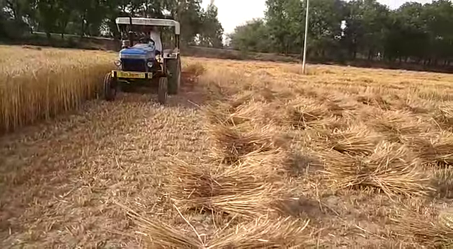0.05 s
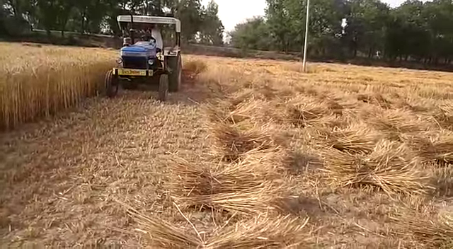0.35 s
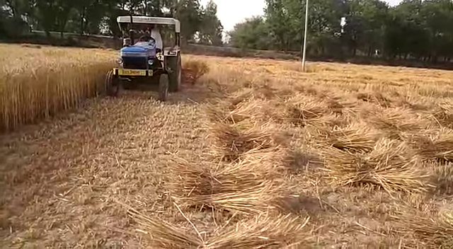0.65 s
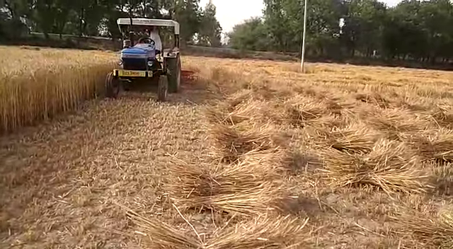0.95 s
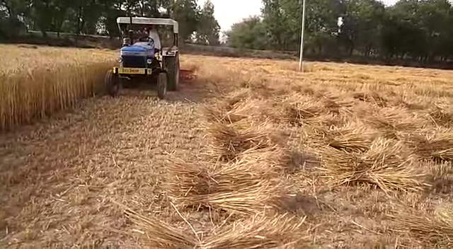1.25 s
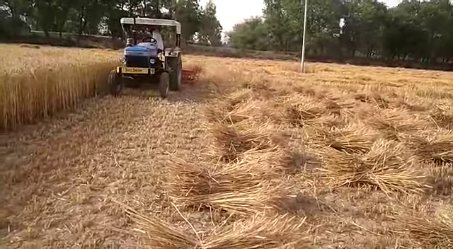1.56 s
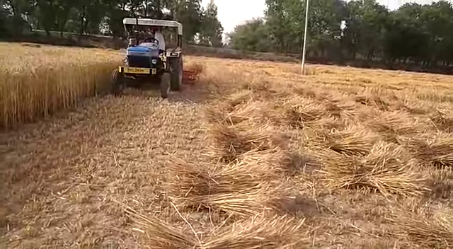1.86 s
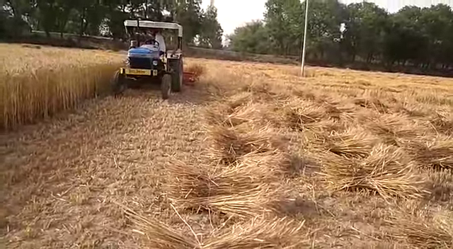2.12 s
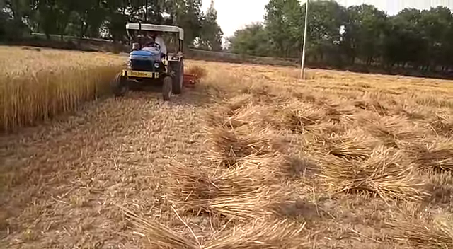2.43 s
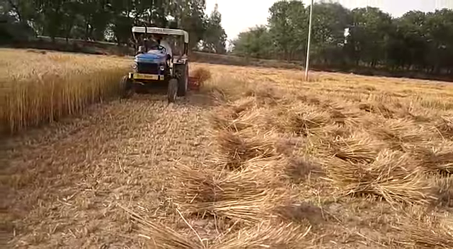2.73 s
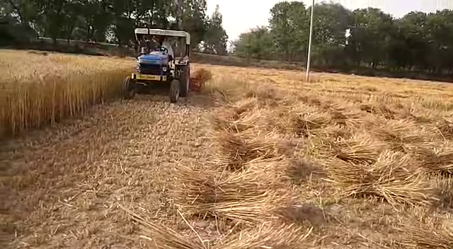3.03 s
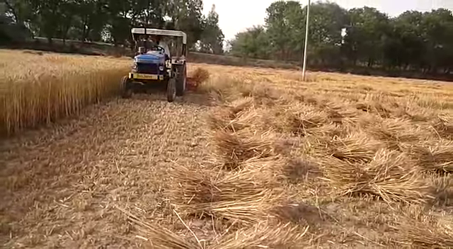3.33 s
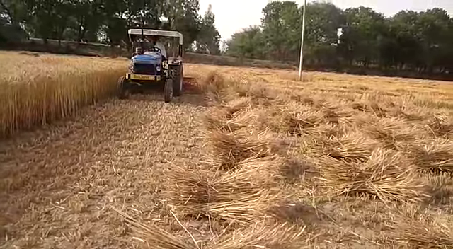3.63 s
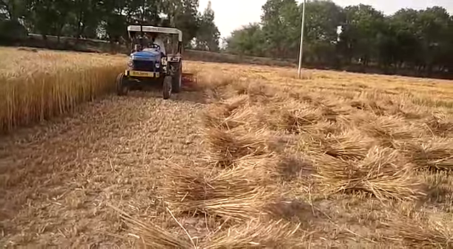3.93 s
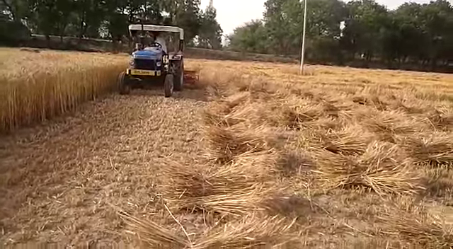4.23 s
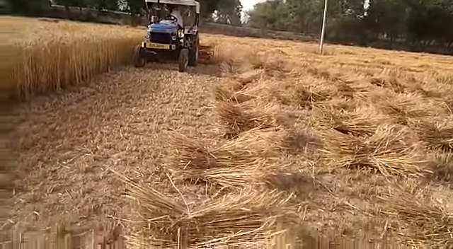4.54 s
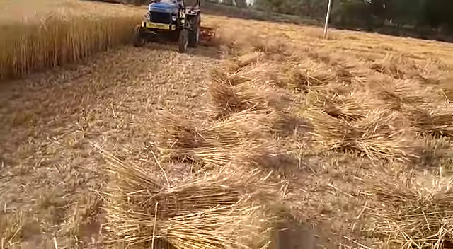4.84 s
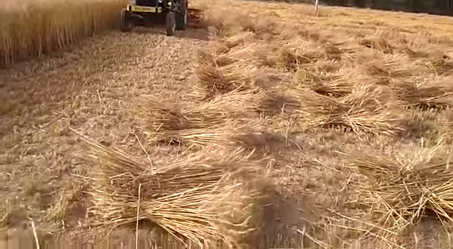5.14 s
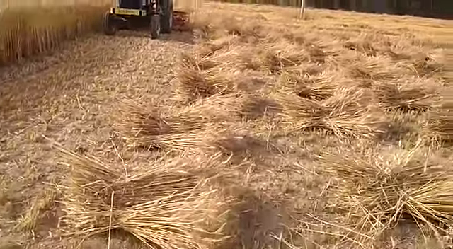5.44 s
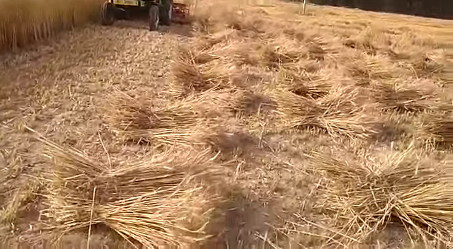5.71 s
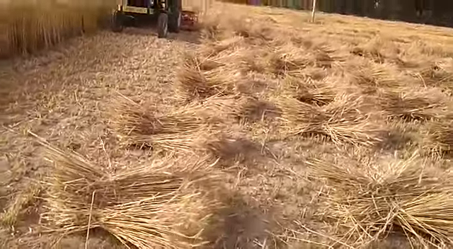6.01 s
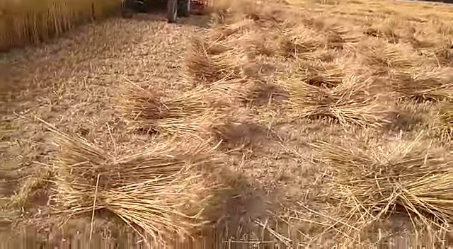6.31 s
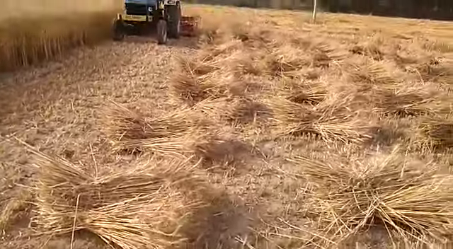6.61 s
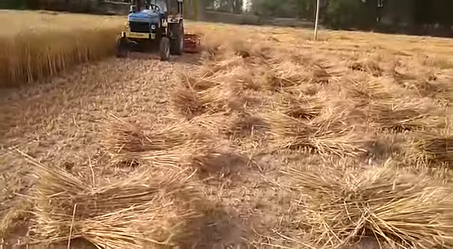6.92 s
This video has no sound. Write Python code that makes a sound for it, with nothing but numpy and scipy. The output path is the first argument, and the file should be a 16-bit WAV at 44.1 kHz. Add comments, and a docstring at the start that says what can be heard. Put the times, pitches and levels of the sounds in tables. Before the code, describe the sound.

Out in a field, a tractor engine throbs while a reaper rattles and wheat crunches lightly. A nearby metal linkage squeaks and clanks sharply near the start, and again about halfway through. Afterwards the drone drops to a quiet hum, and a few low thumps, a raspy on-and-off squeal and the swish of dry straw come forward, all louder in the left microphone.

```python
"""A tractor works a reaper in a wheat field: a throbbing drone with shaft tones that slows to an idle hum.
The cutter rattles, stalks crunch and falling wheat hisses, all fading as the drone sinks.
Twice, close to the microphone, a metal linkage sticks, slips and slams home with a ringing clank.
Once the drone is down, soft bumps, a thin squeal and dry straw sliding over straw come forward.
Heard in stereo, with the left microphone the louder."""
import sys
import numpy as np
from scipy import signal
from scipy.fft import rfft, irfft, next_fast_len
from scipy.io import wavfile
from scipy.ndimage import uniform_filter1d

SR = 44100
rng = np.random.default_rng(int(sys.argv[2]) if len(sys.argv) > 2 else 0)


def waveform_to_disk(signal):
    """Save audio, clipped to [-1, 1], as 16-bit WAV at the path in sys.argv[1]."""
    frames = np.transpose(np.atleast_2d(signal))
    scaled = np.clip(frames, -1, 1) * 32767
    samples = np.round(scaled).astype(np.int16)
    wavfile.write(sys.argv[1], SR, samples)


N = 307377
T = np.arange(N) / SR
EVENT_N = SR * 2 // 5  # samples in one short event
AGE = T[:EVENT_N]
FREQ = np.maximum(np.fft.rfftfreq(32768, 1 / SR), 1)
TOP_HZ = 15900


# brief dips in the drone: time_s, half_width_s, depth_db
DRONE_DIPS = [(5.16, 0.039, 8), (5.365, 0.015, 12), (5.48, 0.01, 8), (5.9, 0.028, 15.5)]
def tractor():
    """The drone out in the field: shaft tones, with a roar and a rumble that throb twice a turn."""
    turn = shaft_angle()
    firing = np.cos(2 * turn)
    drone = shaft_tones(turn) + roar(firing) + idle(firing)
    dip_db = sum(db * np.exp(-((T - at) / width) ** 2) for at, width, db in DRONE_DIPS)
    return drone * undb(-dip_db)

# the shaft slowing to idle: time_s, speed_hz, level_db
SHAFT = [(0, 33.2, -56), (1.4, 27.6, -59), (3.1, 27, -56.5), (3.5, 28.6, -54), (4.0, 16, -61),
         (4.5, 14, -71), (5.0, 15.3, -72), (6.97, 14.8, -81.5)]
def shaft_angle():
    """The shaft turns a little unevenly; its angle in radians."""
    return phase(curve(SHAFT) * (1 + 0.0026 * walk(8.7)))

# harmonics of the shaft: multiple, level_db
SHAFT_ORDERS = [(1, 5), (2, -0.5), (3, -3), (4, 0.5)]
def shaft_tones(turn):
    """Tones at multiples of the shaft speed, each wavering in level."""
    tones = sum(undb(db + 1.3 * walk(1.4)) * np.sin(multiple * turn + rng.uniform(0, 2 * np.pi))
                for multiple, db in SHAFT_ORDERS)
    return tones * undb(curve(SHAFT, axis=2))

# load on the machine, from steady work to idle: time_s, level_db
LOAD = [(0, -48), (1.05, -45), (1.6, -48), (2.4, -47), (3.5, -49), (4.35, -54), (4.75, -59), (5.2, -67),
        (6.0, -65), (6.97, -65.5)]
# spectrum of the roar: frequency_hz, level_db
ROAR = [(20, -25), (55, -9.5), (80, -0.5), (125, -0.5), (170, -1.5), (260, -3.5), (350, -2.5), (385, -18),
        (470, -16.5), (560, -24), (630, -15.5), (700, -21), (820, -29.5), (880, -25), (940, -40),
        (1080, -47), (2000, -48)]
# booming panels: pitch_hz, width_hz, level_db
PANELS = [(108, 15, -6), (209.6, 18, -1), (298.8, 10, 2), (346.9, 7.8, 1), (407, 20, 4.5), (516.4, 16, 5.5),
          (606, 14, -1), (751, 23, 14.5), (782, 23, 5.5), (877, 38, 8), (990, 58, 14.5)]
def roar(firing):
    """What the load adds above the idle: noise booming in panels whose pitch wanders with the strain."""
    idle_db, floor_db = -66.0, -76.0
    load = np.sqrt(np.maximum(undb(2 * curve(LOAD)) - undb(2 * idle_db), undb(2 * floor_db)))
    boom = 1 + resonances(PANELS)
    strained_time = T + np.cumsum(.008 * walk(4)) / SR
    steady = noise(shape(ROAR) * boom, spread=0.063)
    wandering = np.array([np.interp(strained_time, T, side, period=N / SR) for side in steady])
    return wandering * load * undb(3.5) * (1 + 0.19 * firing) * undb(walk(35))

# spectrum of the idle rumble: frequency_hz, level_db
RUMBLE = [(18, -4), (45, 2.5), (100, 1), (150, -11.5), (290, -7.5), (430, -29.5), (560, -33), (760, -24.5),
          (1250, -46), (2500, -34), (4300, -38.5), (8000, -50), (12000, -40.5), (13500, -57)]
# tones of the hum: pitch_hz, level_db
HUM = [(78, -21), (115, 1), (288, -22.5)]
# rise of the hum: time_s, gain_db
HUM_RISE = [(0, -25), (3.6, -5), (4.2, -3.5), (6.97, -0.5)]
def idle(firing):
    """A throbbing rumble runs throughout; a hum comes up in it as the load goes."""
    rumble = noise(shape(RUMBLE), spread=0.31) * (1 + 0.4 * firing)
    hum = 0
    for hz, db in HUM:
        gain = undb(db + 3.1 * walk(3.5) + 1.6 * walk(28))
        hum += gain * np.sin(phase(hz * (1 + 0.03 * walk(30))))
    return (rumble + hum * undb(curve(HUM_RISE))) * undb(-55.5 + 1.85 * walk(15))

# strength of the cutting: time_s, level_db
CUTTING = [(0, -61.5), (1.0, -59), (2.0, -61.5), (3.4, -63), (3.75, -68.5), (4.2, -73), (4.7, -86),
           (5.2, -82), (6.97, -80)]
# spectrum of the cutter's rattle: frequency_hz, level_db
RATTLE = [(700, 6), (1150, 0), (1650, 5.5), (2000, -3), (2400, 3), (3200, 0), (4000, -18.5), (5200, -14.5),
          (6500, -7), (8300, -28), (16000, -27.5)]
def cutter():
    """Loose parts of the reaper's cutter rattle by turns, each in its own band."""
    rattle = 0
    for hz in np.geomspace(800, 7000, 8):
        band = shape(RATTLE) * resonance(hz, hz / 3)
        rattle += np.linalg.norm(band) * noise(band, spread=1.0, grain_db=0.5) * undb(2.4 * walk(45))
    return unit(rattle) * undb(curve(CUTTING) + walk(20))

# clanks and rebounds: start_s, ring_db, crack_db, clatter_db, clatter_t60_s, thrown_out, ring_right_db
CLANKS = [(.825, -36.5, -41.5, -35, 0.16, 0, -5.5), (0.8467, -26.5, -21.5, -23, 0.28, 0, -4),
          (.854, -28.5, -25.5, -35, 0.36, 0, -5.5), (.862, -37.5, -32, -34.5, 0.097, 0, -3),
          (.870, -35.5, -32, -33.5, 0.27, 0, -2.5), (.881, -37.5, -31.5, -32.5, 0.3, 0, -5),
          (3.554, -36.5, -48, -37, 0.14, 1, -1.5), (3.576, -34.5, -29, -33.5, 0.24, 1, 2.5),
          (3.583, -31.5, -22.5, -31.5, 0.24, 1, 3), (3.602, -37, -28, -47, 0.15, 1, -5),
          (3.614, -43, -36.5, -35.5, 0.21, 1, -2.5), (3.654, -57, -51.5, -45, 0.15, 1, -12)]
# spectrum of the first hard contact: frequency_hz, level_db
CRACK = [(300, -25), (800, -4.5), (1500, 1.5), (1950, -5), (2600, 6.5), (3400, -3), (3950, -17),
         (4500, -8.5), (5300, -10), (6900, 4), (8300, -11.5), (11500, 6.5), (13500, 2.5), (16000, -5)]
# spectrum of the loose parts: frequency_hz, level_db
CLATTER = [(300, -31), (600, -14.5), (1000, -14.5), (1500, 2), (1950, -6.5), (2600, 10.5), (3350, -0.5),
           (3900, -23.5), (4300, -21), (5200, -11), (5900, -2.5), (7000, 0.5), (8300, -15), (10000, -2),
           (11700, 4), (13500, -3.5), (16000, -5.5)]
def clanks():
    """Close by, the linkage slams home: it cracks and rings, loose parts clatter, the frame thuds."""
    track = np.zeros((2, N))
    colour = shape(CLATTER) * overtones(46, -15.5, count=60, range_db=8.5)
    for start, ring_db, crack_db, clatter_db, clatter_t60, thrown_out, right_db in CLANKS:
        ring = undb(ring_db) * linkage_ring(thrown_out) * sides(right_db)
        crack = burst(.004, .0018, .055) * noise(shape(CRACK), spread=1.0, grain_db=3.0, count=EVENT_N)
        clatter = noise(colour, spread=0.9, grain_db=3.0, count=EVENT_N)
        clatter *= burst(0.0012, 0.0029, clatter_t60) * undb(2.0 * walk(180, EVENT_N))
        thud = noise(resonance(750, 730), spread=0.089, count=EVENT_N)
        thud *= undb(-14) * burst(0.0036, 0.0023, 0.11)
        add(track, start, ring + undb(crack_db) * crack + undb(clatter_db) * (clatter + thud))
    return track

# modes of the linkage: pitch_hz, t60_s, thrown_in_db, thrown_out_db
LINKAGE_MODES = [(843, 0.24, -6.5, -15.5), (869, .16, -11.5, -3.5), (1092, .16, -13, -17),
                 (1267, 0.17, -11, -7), (1377, 0.5, -11.5, -21.5), (1436, 0.15, -3, 0),
                 (1650, 0.28, -3.5, -16.5), (1695, 0.3, 1, -21), (2080, .22, -6.5, -17),
                 (2167, 0.26, 0.5, -11), (2200, 0.5, -3, -19), (2270, 0.36, -1, -22),
                 (2325, 0.18, -6.5, -12.5), (2600, 0.28, -5.5, 0.5), (2646, 0.37, -3, -2),
                 (2690, 0.47, -3, -3.5), (2740, .28, 0, -3.5), (3133, .3, -18, -15.5), (3270, .24, -8, -9)]
def linkage_ring(thrown_out):
    """The struck linkage rings; its loose joint bends each pitch, and its stop damps it once seated."""
    ring = 0
    for hz, t60, in_db, out_db in LINKAGE_MODES:
        cycles = np.cumsum(hz + 11 * walk(120, EVENT_N)) / SR + rng.random()
        envelope = undb(out_db if thrown_out else in_db) * burst(0, 0.0023, t60)
        ring += envelope * np.sin(2 * np.pi * cycles)
    return ring * burst(hold_s=.03, rise_s=.001, t60_s=.5)

# metal rubbing on metal: start_s, length_s, pitch_hz, squeak_db, grit_db, t60_s
RUBS = [(0.128, 0.016, 2590, -52.5, -66, .1), (0.409, 0.015, 2550, -52, -60, .1),
        (0.54, 0.044, 2280, -36, -46, 0.15), (0.557, 0.02, 1640, -42.5, -63, 0.14),
        (0.564, 0.068, 2700, -38, -48, 0.15), (0.627, 0.028, 2700, -38, -44, 0.11),
        (0.669, 0.0066, 2244, -36.5, -32, 0.11), (0.676, 0.032, 2680, -35.5, -47.5, 0.12),
        (0.701, 0.021, 2705, -24.5, -38.5, 0.12), (0.708, 0.015, 3140, -36, -50, 0.1),
        (0.727, 0.014, 2187, -34, -37.5, 0.11), (0.76, 0.075, 2760, -51.5, -52.5, 0.11),
        (1.41, 0.028, 2460, -61, -61, .1), (2.844, 0.024, 2580, -62, -62, 0.085),
        (3.129, 0.025, 3270, -49, -55, 0.11), (3.253, 0.098, 2600, -41.5, -52.5, 0.11),
        (3.255, 0.045, 3210, -41, -52, 0.16), (3.293, 0.0089, 1696, -38.5, -46, 0.15),
        (3.39, 0.0087, 3140, -32, -40, 0.09), (3.41, 0.035, 2677, -28.5, -50.5, 0.15),
        (3.444, 0.007, 2640, -40, -43.5, 0.17), (3.499, 0.055, 2620, -65, -63.5, .1),
        (3.93, 0.02, 2606, -64, -69, 0.11), (4.871, 0.0076, 3193, -41, -64, 0.11),
        (4.872, 0.0042, 1985, -47.5, -72, 0.13), (4.873, 0.042, 4404, -58.5, -75, 0.078),
        (4.89, 0.0092, 1405, -59, -81, 0.068), (4.93, 0.0063, 3140, -49.5, -66, 0.086),
        (5.247, 0.0062, 3266, -48.5, -92, 0.063), (6.45, 0.077, 3318, -54.5, -82, 0.12),
        (6.484, 0.04, 3777, -57, -88, 0.16), (6.489, 0.032, 4140, -58.5, -93, 0.16)]
# resonances that every rub wakes: pitch_hz, width_hz, level_db
RUB_BODY = [(1638, 91, -22), (2230, 160, -16.5), (2673, 18, 4.5), (3210, 88, -1)]
# spectrum of the grit: frequency_hz, level_db
GRIT = [(1200, -14.5), (1950, -12.5), (2500, -5), (3200, -4.5), (3850, -28.5), (4700, -10), (5600, -1.5),
        (7000, -1.5), (8300, -12), (9200, -6.5), (10800, 1.5), (13000, -8.5), (16000, -11)]
def rubs():
    """Stick and slip near the microphone: each rub sings unsteadily, wakes the body and scrapes."""
    track, modes = np.zeros((2, N)), resonances(RUB_BODY)
    # two points of contact, each with its own high modes
    contacts = [shape(GRIT) * overtones(70, -26, count=24, range_db=13) for _ in range(2)]
    for start, length, hz, squeak_db, grit_db, t60 in RUBS:
        pitch = hz + 70 * walk(900, EVENT_N)
        squeak = np.sin(phase(pitch)) * undb(2.8 * walk(260, EVENT_N) - 1.0)
        shake = undb(-7.0) / (1 + undb(-34.5 - squeak_db))  # only hard rubs shake the whole body
        body = shake * noise(modes, spread=0.94, count=EVENT_N)
        grit = sum(noise(contact, spread=1.0, grain_db=2.5, count=EVENT_N) * catches()
                   for contact in contacts) / np.sqrt(2)
        rub = undb(squeak_db) * (squeak + body) * sides(-7.0) + undb(grit_db + .7) * grit
        add(track, start, burst(length, 0.0022, t60) * rub)
    return track

def catches(per_second=220, decay_s=.011, range_db=14):
    """Envelope of a contact that catches at random: sudden kicks, each dying away."""
    chance, size = rng.random((2, EVENT_N))
    kicks = (chance < per_second / SR) * undb(range_db * size)
    return unit(signal.lfilter([1], [1, -np.exp(-1 / (decay_s * SR))], kicks))

# low bumps: start_s, level_db, pitch_hz
BUMPS = [(2.418, -33, 189), (4.800, -37, 72), (4.866, -33, 58), (4.93, -38.5, 65.2), (5.242, -35, 50.5),
         (6.525, -41.5, 70.2)]
def bumps():
    """Soft low knocks that die within a few swings."""
    track = np.zeros((2, N))
    for start, db, hz in BUMPS:
        add(track, start, -undb(db) * burst(0.0035, 0.0035, 0.069) * np.sin(2 * np.pi * hz * AGE))
    return track

# ticks, light knocks and snapping stalks: start_s, level_db, centre_hz, decay_s
TICKS = [(0.145, -60.5, 5400, 0.013), (.514, -42.5, 756, 0.031), (1.075, -60.5, 5350, 0.037),
         (1.078, -49.5, 10800, 0.015), (1.415, -56, 6800, 0.012), (1.445, -60, 6900, 0.008),
         (1.415, -55, 12000, 0.016), (1.575, -61.5, 6400, .012), (1.645, -51, 8000, 0.0073),
         (1.846, -49, 11500, 0.011), (1.848, -58.5, 6200, 0.021), (1.985, -60, 6600, 0.033),
         (2.12, -63, 6430, 0.014), (2.405, -49, 840, 0.029), (2.717, -54, 6140, 0.012),
         (2.785, -58, 6670, 0.013), (2.855, -61, 5800, 0.014), (2.99, -58, 6500, 0.018),
         (3.064, -40.5, 6800, 0.01), (3.09, -58.5, 6540, 0.043), (3.376, -45, 6980, 0.051),
         (3.895, -54, 746, 0.033), (4.315, -59.5, 731, 0.017), (4.352, -67.5, 6280, 0.019),
         (4.499, -51, 719, 0.011), (4.909, -44.5, 7700, 0.0059), (4.910, -43, 13800, 0.003),
         (5.128, -57, 6250, 0.016), (5.568, -34, 13400, 0.0055), (5.73, -64, 9120, 0.035),
         (6.066, -64, 10500, 0.008), (6.13, -68, 6550, 0.013)]
def ticks(rise_s=.0012):
    """Short dry snaps and knocks, each a band of noise with its own brief ring."""
    track = np.zeros((2, N))
    for start, db, hz, decay_s in TICKS:
        colour = resonance(hz, .2 * hz) * overtones(57, -23.5, range_db=16)
        envelope = undb(db) * (1 - np.exp(-AGE / rise_s)) * np.exp(-AGE / decay_s)
        add(track, start, envelope * noise(colour, spread=11.0, count=EVENT_N))
    return track

# chirrs of the squeal: start_s, length_s, level_db, pitch_hz
CHIRRS = [(5.32, 0.077, -68.5, 2000), (5.323, 0.014, -68, 2570), (5.336, 0.015, -61.5, 2700),
          (5.453, 0.012, -64, 2740), (5.455, 0.22, -70.5, 2002), (5.492, 0.028, -59, 2005),
          (5.509, 0.022, -50.5, 2015), (5.696, 0.017, -63.5, 2630), (5.729, 0.18, -60.5, 2025),
          (5.817, 0.058, -53, 2677), (5.887, 0.016, -61, 2520), (5.938, 0.1, -52, 2057),
          (6.051, 0.032, -61.5, 2027), (6.059, 0.01, -52.5, 2598), (6.141, 0.08, -57.5, 2040),
          (6.217, 0.053, -63.5, 2064), (6.377, 0.14, -55, 2046), (6.525, 0.032, -59, 2640),
          (6.55, .08, -76, 2010), (6.69, 0.013, -60, 2085), (6.738, 0.1, -60.5, 2020),
          (6.895, 0.085, -58, 2038), (6.95, 0.03, -53, 2060)]
def squeal():
    """Well to the left, a thin raspy squeal comes and goes, now and then jumping higher."""
    track = np.zeros((2, N))
    for start, length, db, hz in CHIRRS:
        pitch = hz + 55 * walk(600, EVENT_N)
        rasp = undb(-2) * noise(resonance(hz, 90), spread=.4, count=EVENT_N)
        flutter = undb(3 * walk(131.6, EVENT_N) - 1.0)
        chirr = (np.sin(phase(pitch)) + rasp) / np.sqrt(2) * flutter
        add(track, start, undb(db) * burst(length, 0.009, 0.16) * chirr)
    return track

# strokes of straw over straw: start_s, length_s, swish_db, rasp_db
STRAW_STROKES = [(4.909, 0.095, -71, -65), (5.002, 0.099, -69, -60), (5.119, 0.038, -66, -55.5),
                 (5.477, 0.065, -64.5, -92), (5.554, 0.31, -56, -84), (6.173, 0.086, -54.5, -84),
                 (6.283, 0.12, -67, -77.5), (6.395, 0.04, -54.5, -78), (6.49, 0.026, -80, -66)]
# spectrum of the swish: frequency_hz, level_db
SWISH = [(7000, -18), (10000, -5), (12000, 8.5), (13000, 2.5), (14500, 9.5), (16000, 6.5)]
def straw():
    """Dry stalks slide over each other: a wide bright swish, and a lower rasp to the left."""
    pressure = np.zeros((2, N))  # one row for the swish, one for the rasp
    for start, length, swish_db, rasp_db in STRAW_STROKES:
        add(pressure, start, undb([[swish_db], [rasp_db]]) * burst(length, 0.0047, 0.16))
    swish = stalks(shape(SWISH), spread=7.1) * pressure[0] * sides(1.0)
    rasp = stalks(resonance(8290, 760), spread=1.9) * pressure[1] * undb(1.3 * walk(120)) * sides(-19.5)
    return swish + rasp

def stalks(colour, spread, bunches=4):
    """Bunches of stalks, each with its own resonances, take turns to scratch in dense tiny clicks."""
    total = 0
    for _ in range(bunches):
        scratch = noise(colour * overtones(100, -31, range_db=17), spread=spread, grain_db=5.5)
        total += scratch * undb(1 + 4 * walk(30))
    return total / bunches

def crunches(count=45):
    """Stalks crunch at random moments, following the strength of the cutting; most are faint."""
    track, cutting_db = np.zeros((2, N)), curve(CUTTING)
    colour = shape(GRIT) * overtones(160, -9)
    for moment, size in rng.random((count, 2)):
        crunch = burst(.006, 0.0045, 0.021) * noise(colour, spread=2.2, grain_db=2.0, count=EVENT_N)
        db = cutting_db[int(moment * N)] - 5 + 10 * size ** 2
        add(track, moment * N / SR, undb(db) * crunch)
    return track

# hiss of the wheat: time_s, level_db
WHEAT_LEVEL = [(0, -63.5), (1.0, -63.5), (2.0, -63.5), (3.4, -65.5), (4.0, -66), (4.5, -71), (4.8, -76),
               (5.3, -88.5), (6.97, -87.5)]
# spectrum of that hiss: frequency_hz, level_db
WHEAT_HISS = [(6000, -33), (8300, -22.5), (9800, -7.5), (11500, 3.5), (12600, -0.5), (14000, -12),
              (16000, -8)]
def falling_wheat():
    """Behind the rattle, cut wheat falls with a fine, high hiss."""
    hiss = noise(shape(WHEAT_HISS), spread=1.0, grain_db=1.5)
    return hiss * undb(curve(WHEAT_LEVEL) + 1.2 * walk(28))

def undb(db):
    """Decibels to gain."""
    return 10 ** (np.asarray(db) / 20)

def unit(x):
    """Scale to rms 1."""
    return x / np.sqrt(np.mean(x ** 2))

def phase(hz):
    """Running angle of a changing frequency, in radians."""
    return 2 * np.pi * np.cumsum(hz) / SR

def curve(rows, axis=1):
    """One column of a table, joined by straight lines in time."""
    rows = np.array(rows)
    return np.interp(T, rows[:, 0], rows[:, axis])

def shape(points):
    """Gain at every frequency from (Hz, dB) points."""
    hz, db = np.transpose(points)
    return undb(np.interp(np.log(FREQ), np.log(hz), db))

def resonance(hz, width_hz):
    """Gain of a resonance with steep skirts."""
    return 1 / (1 + ((FREQ ** 2 - hz ** 2) / (FREQ * width_hz)) ** 2)

def resonances(rows):
    """Summed gain of a body's resonances."""
    return sum(undb(db) * resonance(hz, width) for hz, width, db in rows)

def overtones(width_hz, valley_db, count=30, range_db=25):
    """Gain of a stiff part's many high modes, unevenly spaced and unequally strong."""
    pitches = np.linspace(4300, 16000, count) + rng.uniform(-170, 170, count)
    comb = undb(valley_db) + resonances((hz, width_hz, 10 - range_db * rng.random()) for hz in pitches)
    high = FREQ > 4000
    return np.where(high, comb / np.sqrt(np.mean(comb[high & (FREQ < TOP_HZ)] ** 2)), 1)

def filtered(x, gain):
    """Apply a gain given at every frequency."""
    count = x.shape[-1]
    size = next_fast_len(count)
    return irfft(rfft(x, size) * np.interp(np.fft.rfftfreq(size, 1 / SR), FREQ, gain), size)[..., :count]

def noise(gain, spread=0., grain_db=0., count=N):
    """Coloured stereo noise; spread is the unrelated part, grain_db breaks it into clicks."""
    chance = np.minimum(rng.exponential(size=count // 16 + 1), 5)
    sizes = np.repeat(undb(grain_db * chance), 16)[:count]
    left, other = filtered(rng.standard_normal((2, count)) * sizes, gain)
    return np.array([unit(left), unit(left + spread * other)])

def walk(rate_hz, count=N):
    """Smooth random drift with a spread near 1."""
    hold = int(SR / rate_hz)
    steps = np.repeat(rng.standard_normal(count // hold + 1), hold)
    return 1.26 * uniform_filter1d(uniform_filter1d(steps, hold), hold)[:count]

def burst(hold_s, rise_s, t60_s):
    """Envelope of one event: it rises, holds while the contact lasts and dies away."""
    return (1 - np.exp(-AGE / rise_s)) * np.exp(-np.log(1000) * np.maximum(AGE - hold_s, 0) / t60_s)

def sides(right_db):
    """Gains at the two microphones for a source off to one side."""
    return np.array([[1], [undb(right_db)]])

def add(track, start, sound):
    """Mix a short sound into a track."""
    first = int(start * SR)
    track[:, first:first + sound.shape[-1]] += sound[..., :N - first]

# the right microphone against the left: frequency_hz, gain_db
RIGHT_MICROPHONE = [(60, -6.5), (220, -6.5), (380, -8), (700, -5), (1290, -6.5), (2400, -12), (3300, -10),
                    (4400, -1), (8000, -7.5), (12000, -9), (16000, -10.5)]
def scene():
    """The field at the microphones; the right one is quieter and hears it 5.6 samples sooner."""
    reaping = tractor() + cutter() + falling_wheat()
    linkage = clanks() + rubs()
    left, right = reaping + linkage + ticks() + crunches() + bumps() + squeal() + straw()
    lead = np.exp(2j * np.pi * FREQ * 5.6 / SR)
    return np.array([left, filtered(right, shape(RIGHT_MICROPHONE) * lead)])

def record(dry):
    """The recorder cuts the top treble steeply."""
    return signal.sosfilt(signal.ellip(10, .2, 70, TOP_HZ, fs=SR, output="sos"), dry)


dry = scene()
out = record(dry)
waveform_to_disk(out)
```